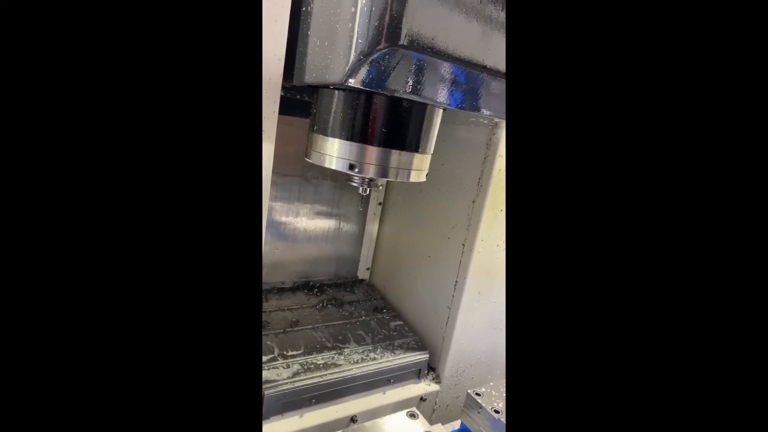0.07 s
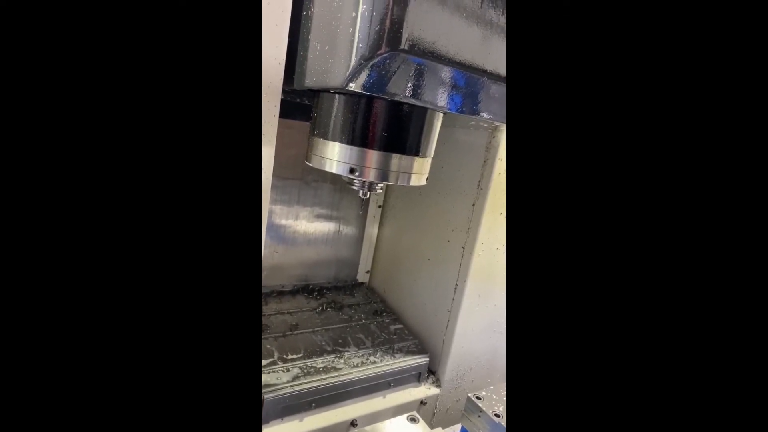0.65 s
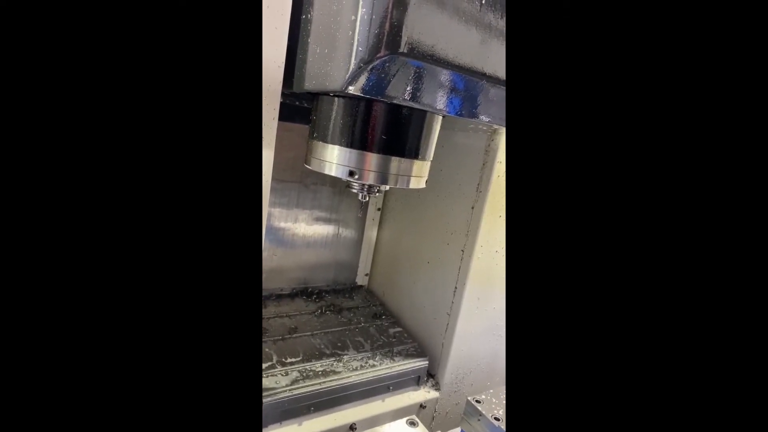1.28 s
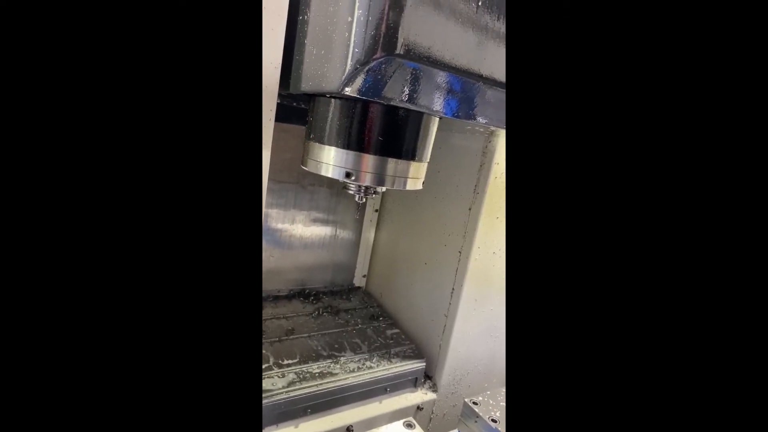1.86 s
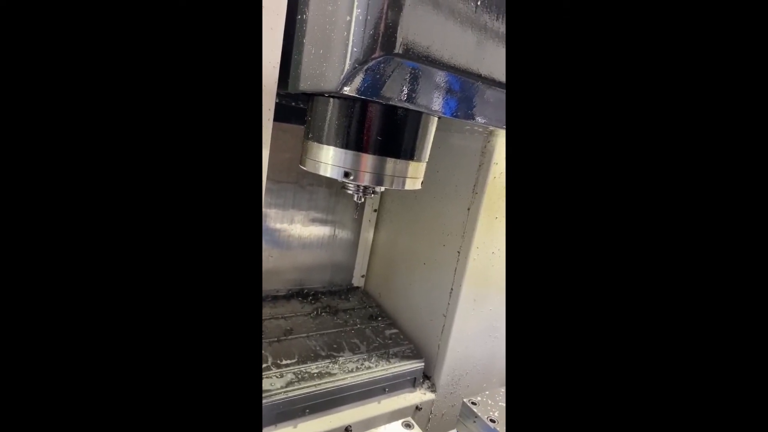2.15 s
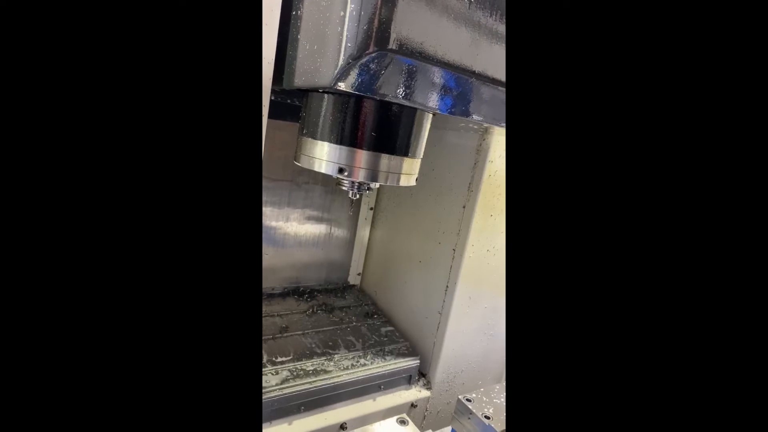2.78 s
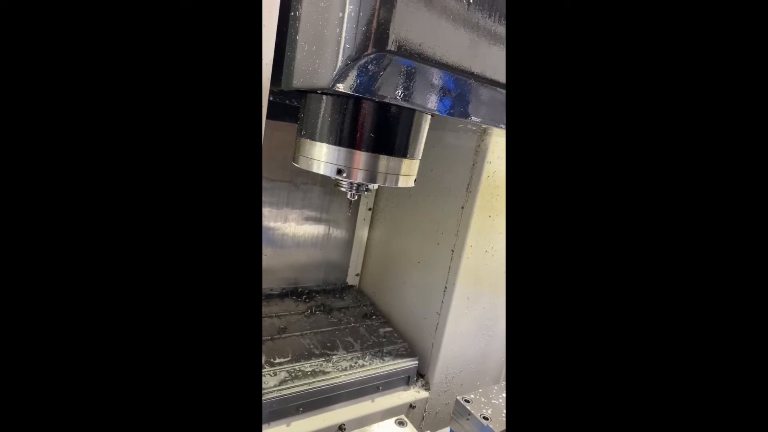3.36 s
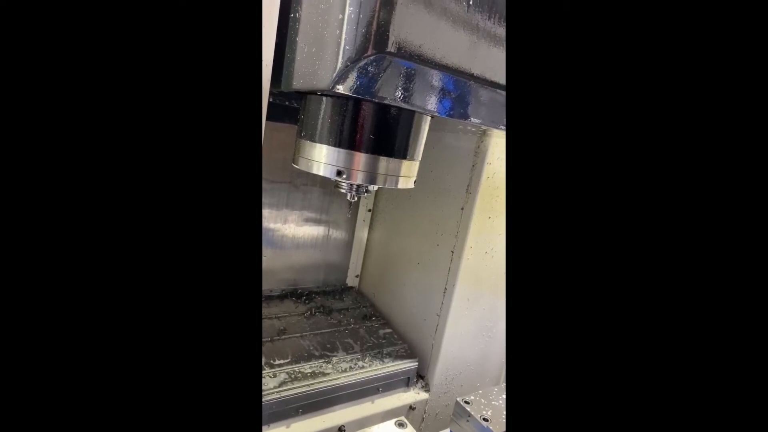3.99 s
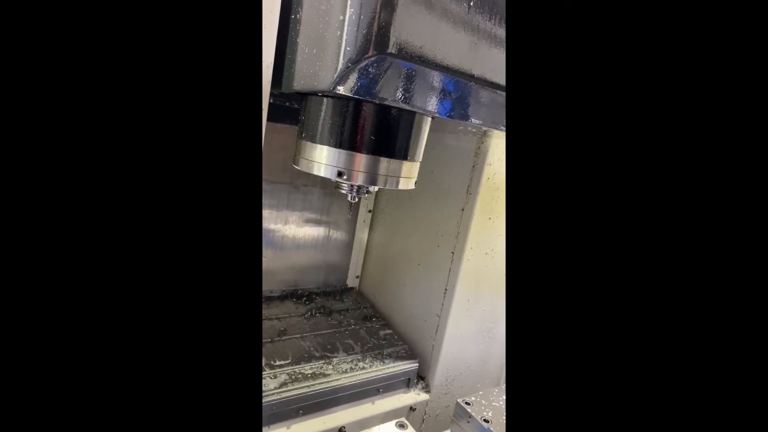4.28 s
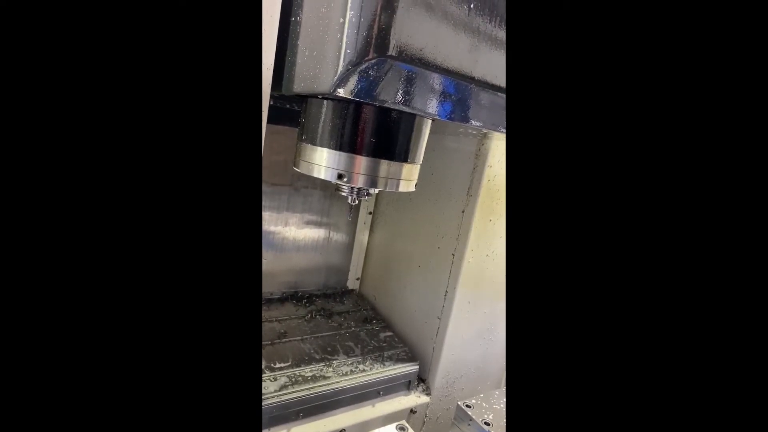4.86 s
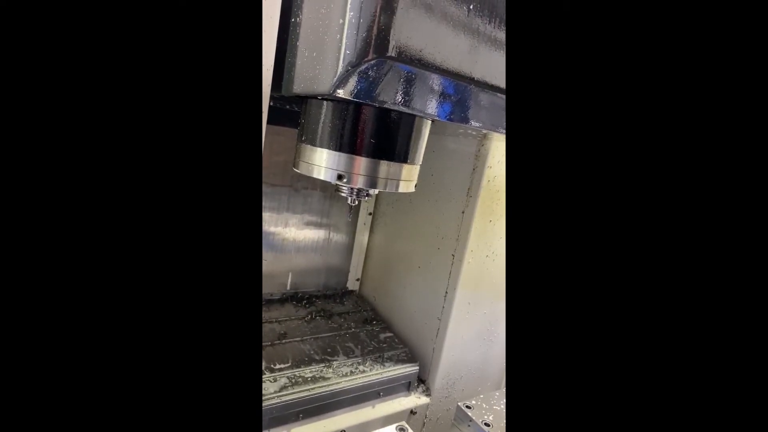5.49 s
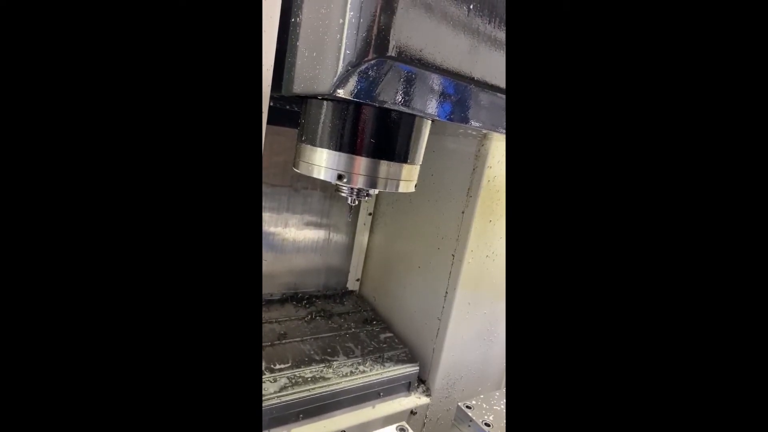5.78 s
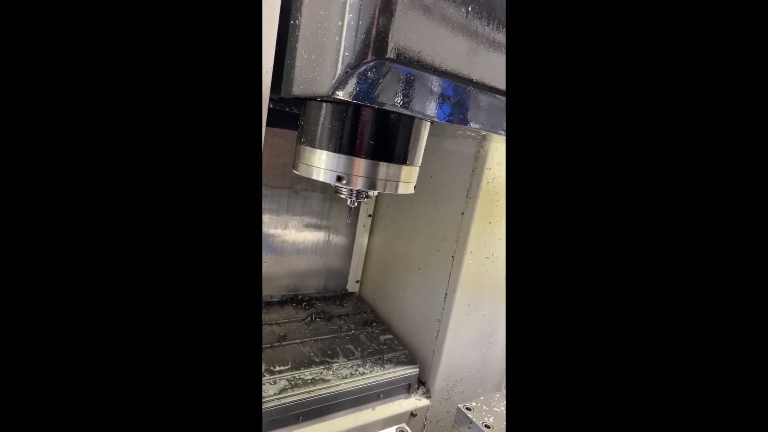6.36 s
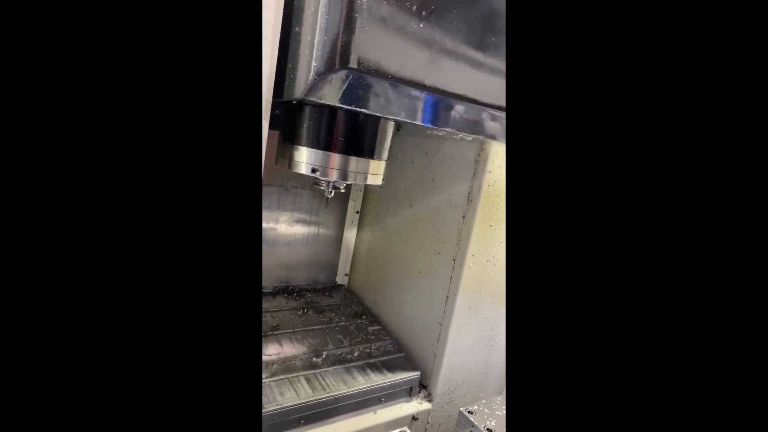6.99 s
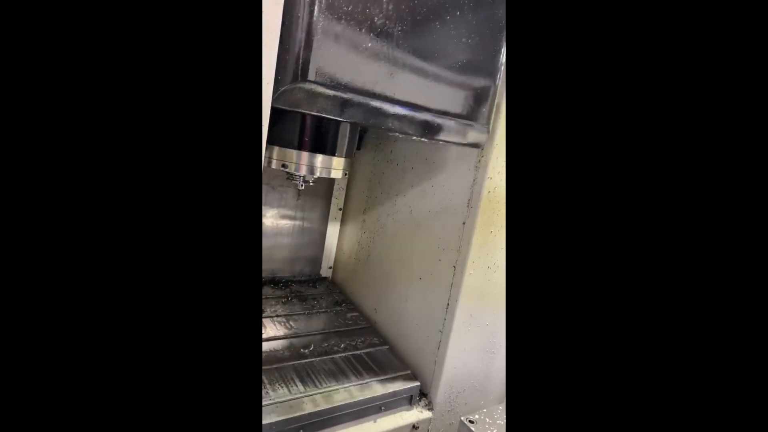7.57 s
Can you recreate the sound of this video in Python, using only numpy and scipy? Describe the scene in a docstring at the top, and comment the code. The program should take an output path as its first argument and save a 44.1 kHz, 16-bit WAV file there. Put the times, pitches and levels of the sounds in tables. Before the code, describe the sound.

A milling machine idles in a workshop, heard at its open door. Air hisses with a thin high whistle inside the steel cabinet, over humming pumps and occasional dull thuds. At first a feed motor drones and stops with a brief groan and rasp. Near the end two clacks sound and the head travels sideways, its sliding covers rumbling and thumping.

```python
"""A machining center idles in a workshop, heard at its open door. Throughout, pumps hum, purge air
hisses and whistles in the steel cabinet, and the frame gives an occasional dull thud.
For the first second a feed axis drones on its ball screw, then brakes with a groan and a rasp.
From about 6.5 s two clacks sound and the head travels sideways: its sliding covers rumble and
thump, more contacts knock, and resonances sweep through the hiss."""
import sys
import numpy as np
from scipy import signal
from scipy.fft import rfft, irfft
from scipy.io import wavfile
from scipy.ndimage import uniform_filter1d

SR = 44100
rng = np.random.default_rng(int(sys.argv[2]) if len(sys.argv) > 2 else 0)


def master(y):
    """Save y as 16-bit WAV."""
    cut = np.clip(np.atleast_2d(y).T, -1, 1)
    pcm = np.round(cut * 32767)  # scale
    wavfile.write(sys.argv[1], SR, pcm.astype(np.int16))


N = 336924
T = np.arange(N) / SR
FRAME = 2048  # noise is shaped on a grid of frequencies HZ by times FRAME_T
HZ = np.fft.rfftfreq(FRAME, 1 / SR)[:, None]
FRAME_T = np.arange(-(-N // (FRAME // 2)) + 1) * FRAME / 2 / SR

# resonances of the steel cabinet: pitch_hz, width_hz, lift_db
CABINET = [(1200, 70, 3.5), (1413, 89, 4.2), (1808, 45, 6.8), (1968, 62, 11.8), (2440, 66, 7.2),
           (2515, 36, 7), (2762, 45, 5), (2880, 70, 3.6), (2984, 40, 9.4), (3120, 40, 2), (3215, 35, 4),
           (3322, 35, 3), (3735, 70, 3.3), (3880, 45, 2.5), (3955, 35, 3.6), (4390, 35, 3), (4542, 40, 5.8),
           (4660, 30, 3), (4770, 46, 3), (4915, 50, 4), (5886, 162, 6.0), (6381, 86, 4.4), (6837, 121, 6.1),
           (7065, 33, 7.0), (7224, 73, 5.7), (7729, 156, 8.1), (8130, 149, 6.6), (8557, 64, 8.1),
           (8991, 69, 7.5), (9671, 71, 6.2), (10151, 82, 5.3), (10391, 52, 5.6), (11920, 170, 6.6),
           (12612, 58, 6.0), (12819, 122, 8.0), (13001, 101, 7.3), (14003, 170, 9.7), (14317, 60, 7.2),
           (15311, 86, 9.5)]
# the head's path across the cabinet: time_s, share_of_way (0-1)
TRAVEL = [(6.45, 0), (6.8, .5), (7.64, 1)]
# stereo image: pitch_hz, likeness (0-1), left_lead_rad, left_over_right_db
STEREO = [(110, 1, 0, -.9), (250, .96, 0, -2.8), (450, .85, 0, -1.3), (680, .6, .1, -.7),
          (1100, .75, 0, -.3), (1450, .985, 0, -.2), (2050, .99, 0, -.2), (2450, .8, .3, -.7),
          (2850, .5, 1.1, -1), (3500, .72, .4, -.5), (4700, .65, .55, -.3), (5500, .88, .15, 0),
          (6100, .7, 1.7, 0), (6450, .85, 2.85, 0), (6950, 1, 3.14, 0), (7550, 1, 3.14, 0),
          (8100, .88, 3.6, 0), (9200, .7, 5.2, 0), (9750, .99, 6.28, 0), (11600, .97, 6.28, 0),
          (12000, .65, 8, 0), (12500, .87, 9.2, 0), (13150, 1, 9.42, 0), (14300, .98, 9.42, 0),
          (15050, .5, 10, 0), (15750, .85, 12.5, 0)]


def feed_axis(drone_db=-40, brake_s=1.02, sag_per_s=0.6, fade_db_per_s=110.5, stop_s=1.2):
    """Servo and ball screw drone over rolling noise, then run down, groan and rasp to a stop."""
    # overtones of the drive: harmonic, level_db
    harmonics = [(1, -22), (2, -27), (3, -12), (4, -5.5), (5, -4), (6, -6), (7, -5), (8, -2.5), (9, 3.5),
                 (10, -1.5), (11, -15), (12, -20), (13, -14), (14, -18), (15, -0.5), (16, -8.5), (17, -12),
                 (18, -10.5), (19, -16), (20, -14)]
    # balls rolling in the screw and guides: pitch_hz, level_db_per_hz
    rolling_colour = [(60, -89), (180, -71), (300, -69), (360, -65), (420, -56.5), (500, -57), (600, -61),
                      (690, -59), (780, -78), (840, -60), (950, -69), (1500, -69), (2500, -101)]
    # decay of the rolling once the balls stop: pitch_hz, fade_db_per_s
    rolling_fade = [(480, 75), (650, 260)]
    # the slide's last rasp: pitch_hz, level_db_per_hz
    rasp_colour = [(450, -77), (720, -52), (800, -77), (880, -65), (1150, -70), (1400, -84), (2500, -97)]
    drive_hz, groan_hz, smear_turns = 54.95, 473, .115
    braking_s = np.maximum(T - brake_s, 0)
    speed = np.maximum(1 - sag_per_s * braking_s, 0)
    turns = drive_hz * np.cumsum(speed) / SR + .008 * wander(6)
    drone = sum(tone(k * drive_hz, k * turns + smear_turns * wander(15),
                     db + drone_db + 2.5 * wander(6.5)) for k, db in harmonics)
    groan = tone(groan_hz, groan_hz * T + smear_turns * wander(15), db=-31.5)
    groan *= bell(T, centre_s=1.113, width_s=.042)
    rasp_gate = np.exp(-((T - 1.19) / .036) ** 4)
    chatter = 1 + .46 * np.sin(2 * np.pi * turns)
    rasp = noise(colour(rasp_colour)) * rasp_gate * chatter
    rolling = noise(colour(rolling_colour) - colour(rolling_fade) * np.maximum(FRAME_T - stop_s, 0))
    return drone * amp(-fade_db_per_s * braking_s) + rolling + groan + rasp


def traverse(start_s=6.445, speed_up_s=.24, level_db=1.5, judder_db=1.5, growl_s=7.05):
    """The covers scrape and judder, louder as the head gathers speed, and a growl builds."""
    # rumble of the slide and its covers: pitch_hz, level_db_per_hz
    slide_colour = [(25, -78), (50, -64), (80, -45), (115, -40.5), (170, -58.5), (250, -52), (320, -58.5),
                    (500, -58), (720, -68), (850, -68), (1100, -68.5), (2400, -74.5), (4800, -74),
                    (9000, -89)]
    speed = 1 - np.exp(-np.maximum(T - start_s, 0) / speed_up_s)
    late = np.clip(FRAME_T - growl_s, 0, 1)
    growl_db = humps([(330, 420, 5)]) * (2 * late - 1)  # the low mids start scooped and fill in
    return noise(colour(slide_colour) + growl_db) * speed * amp(level_db + judder_db * wander(13))


def cover_thumps():
    """The sheet metal of the sliding covers booms as they are shoved along."""
    # shoves: start_s, level_db, hardness_db_per_octave
    thumps = [(6.72, -5, -1), (6.827, -8, -10), (6.94, -13.5, 18), (7.038, -14, -3), (7.114, -10.5, 12),
              (7.146, -15, 6), (7.174, -9, 9), (7.203, -11, -2), (7.268, -11.5, 20.5), (7.316, -6, 7.5),
              (7.352, -16, 6), (7.424, -9, 1), (7.468, -19, 10), (7.503, -15, 1), (7.59, -28, 35)]
    # modes of the cover sheet: pitch_hz, level_db, t60_s
    sheet_modes = [(116.6, 2, 0.1), (150.7, -10.5, 0.033), (211, -23.5, 0.1), (273, -38, 0.048)]
    return booms(thumps, sheet_modes, level_db=-2, push_s=.015)


def clacks(rise_s=.0015, fall_s=.015, ring_rise_s=.0088):
    """As the slide takes up load, contacts rattle the cabinet, knock the frame and ring the steel."""
    # contacts: start_s, rattle_db, knock_db, ring_db, tick_db
    contacts = [(6.481, -6, -5, -44, -20), (6.487, 0, -3, -40, -17), (6.494, -6, 3, -45, -22),
                (6.506, -2, -2, -44, -17), (6.514, -2, -1, -40, -17), (6.528, -9, -12, -43, -22),
                (6.698, -4, -18, -22, -4), (6.706, -8, -18, -45, -9), (6.722, -8, -11, -42, -16),
                (7.12, -16, -3, -45, -25), (7.278, -13, -3, -45, -25), (7.335, -10, -4.5, -42, -22),
                (7.463, -12, -10, -30, -14), (7.515, -9, -2, -40, -20)]
    # midrange rattle: pitch_hz, level_db_per_hz
    rattle_colour = [(300, -74), (700, -54), (1000, -63), (1400, -59.5), (2000, -57.5), (2350, -67),
                     (2800, -63.5), (4000, -76), (9000, -90)]
    # low knock: pitch_hz, level_db_per_hz
    knock_colour = [(30, -61), (90, -39), (160, -47), (260, -47), (340, -62), (440, -44), (530, -60),
                    (740, -59), (1050, -65), (2500, -95)]
    # bright tick: pitch_hz, level_db_per_hz
    tick_colour = [(1500, -85), (3000, -64), (4200, -74), (5600, -58), (6500, -62), (12000, -82)]
    # modes of the struck steel: pitch_hz, level_db, t60_s
    steel_modes = [(991, 0, .055), (1390, -10, .06), (1760, -6, .05), (2310, -8, .18), (2960, -13, .15),
                   (5600, -16, .06)]
    power, ring = np.zeros((3, N)), np.zeros(N)
    t = np.arange(SR // 4) / SR
    burst = np.minimum(t / rise_s, 1) * np.exp(-np.maximum(t - rise_s, 0) / fall_s)
    ringing_s = np.maximum(t - ring_rise_s, 0)
    for start_s, rattle_db, knock_db, ring_db, tick_db in contacts:
        steel = sum(amp(ring_db + db - 60 * ringing_s / t60)
                    * np.sin(2 * np.pi * (hz * t + rng.random())) for hz, db, t60 in steel_modes)
        add_at(ring, start_s, steel * np.minimum(t / ring_rise_s, 1))
        add_at(power, start_s, np.outer(amp([rattle_db, knock_db, tick_db]), burst) ** 2)
    rattle_env, knock_env, tick_env = np.sqrt(power)
    rattle = rattle_env * noise(colour(rattle_colour) + .95 * humps(CABINET))
    knock = knock_env * noise(colour(knock_colour))
    tick = tick_env * noise(colour(tick_colour))
    return rattle + knock + tick + ring


def pumps(pump_hz=221.2, held_hz=446.8, beat_hz=1.083, in_step_s=3.97, second_motor_db=-11):
    """Motor tones waver and beat over a slowly growing rumble of fans and oil."""
    # steady tones of the pump and fan motors: pitch_hz, level_db
    motor_tones = [(55.1, -50), (95.1, -43.5), (110.4, -43.5), (118.4, -43), (173.7, -44), (236.8, -48.5),
                   (258.4, -49.5), (279.9, -64.5), (323.2, -48), (332.6, -55), (362, -57.5), (511.4, -54.5),
                   (559.9, -60.5), (666.1, -60), (835, -55.5)]
    # the pump's tone as its load builds and eases: time_s, level_db
    pump_load = [(0, -49), (2.4, -45.5), (2.85, -42), (4.8, -40), (5.6, -39), (6.1, -53), (7.64, -37)]
    # the pump's octave: time_s, level_db
    octave_levels = [(1.5, -55), (2, -50.5), (2.3, -60), (2.72, -62), (2.87, -47.5), (3.4, -45), (3.7, -57),
                     (3.95, -50), (4.6, -49.5), (5.2, -47.5), (5.5, -55), (5.68, -47.5), (5.85, -61)]
    # a motor tone just above that octave swells, holds and fades: time_s, level_db
    held_levels = [(3.7, -70), (3.92, -46), (4.25, -43.5), (4.52, -43), (4.62, -52), (5.2, -54), (5.5, -70)]
    # fans and flowing oil: pitch_hz, level_db_per_hz
    rumble_colour = [(25, -88), (40, -84), (55, -50), (80, -75), (105, -54.5), (150, -54), (190, -71),
                     (225, -59), (300, -67.5), (410, -74), (520, -70), (750, -76.5), (1100, -74),
                     (1500, -87)]
    fluttered_s = T + .00013 * wander(24)
    hum = sum(tone(hz, hz * fluttered_s + .1 * wander(3), db - 1 + 2 * (1 + hz / 1000) * wander(4.4))
              for hz, db in motor_tones)
    turns = pump_hz * fluttered_s + .038 * wander(1.7)
    # a second motor runs slightly slower and beats with the pump
    beat = 1 + amp(second_motor_db) * np.exp(-2j * np.pi * beat_hz * (T - in_step_s))
    pump = abs(beat) * tone(pump_hz, turns + np.angle(beat) / (2 * np.pi), curve(pump_load))
    octave = tone(2 * pump_hz, 2 * turns, curve(octave_levels) + 1.2 * wander(2.7))
    held = tone(held_hz, held_hz * fluttered_s, curve(held_levels))
    flow_db = -.5 + .4 * T + 1.1 * wander(5.9)
    return hum + pump + octave + held + noise(colour(rumble_colour)) * amp(flow_db)


def purge_air(detune=.03, sweep_width_hz=105, sizzle_hz=8400, sizzle_width_hz=2000):
    """Air hisses through the cabinet's resonances, which dissolve into sweeps as the head moves."""
    # hiss between the resonances: pitch_hz, level_db_per_hz
    hiss_colour = [(300, -100), (1250, -75.1), (1600, -69.3), (2300, -67.0), (3100, -69.5), (3900, -69.4),
                   (4800, -72), (5600, -75.8), (7400, -75.1), (8300, -70.6), (10000, -73.0), (11500, -77.9),
                   (13500, -80.0), (15700, -78.1)]
    # dips where echoes in the cabinet cancel: pitch_hz, width_hz, lift_db
    dips = [(1720, 35, -2.5), (1890, 45, -2.5), (2080, 40, -2), (2350, 50, -3), (2660, 80, -2.5),
            (2818, 40, -4), (3040, 40, -6), (3270, 40, -3), (3378, 42, -8), (4000, 35, -3), (4230, 120, -1),
            (5680, 130, -2.5)]
    # resonances as the head passes the walls: centre_s, half_length_s, pitch_hz, glide_hz_per_s, lift_db
    sweeps = [(6.59, .04, 1980, 0, 4), (6.87, .12, 2330, -450, 7), (6.86, .12, 2860, 300, 4),
              (6.92, .17, 3240, 200, 6), (6.92, .2, 4690, 200, 7.5), (7.01, .07, 1930, -1500, 8),
              (7.12, .12, 4480, -400, 6), (7.19, .08, 2280, -900, 7.5), (7.19, .06, 1920, 1200, 5.5),
              (7.26, .11, 3790, -700, 9.5), (7.39, .07, 3610, 200, 12), (7.43, .06, 4690, -600, 8.5),
              (7.52, .09, 2380, -700, 5)]
    # brief swells of the sizzle: centre_s, lift_db
    swells = [(.31, 3.5), (.9, 4)]
    way = curve(TRAVEL, FRAME_T)
    cabinet_db = humps(CABINET + dips, 1 + detune * way)
    blurred_db = uniform_filter1d(cabinet_db, size=31, axis=0)
    cabinet_db += np.minimum(2 * way, 1) * (blurred_db - cabinet_db)  # fully blurred by halfway
    sweep_db = sum(bell(FRAME_T, s, half) * humps([(hz + glide * (FRAME_T - s), sweep_width_hz, db)])
                   for s, half, hz, glide, db in sweeps)
    swell_db = sum(db * bell(FRAME_T, s, width_s=.11) for s, db in swells)
    sizzle_band = 1 / (1 + (2 * (HZ - sizzle_hz) / sizzle_width_hz) ** 4)
    sizzle_db = (swell_db - 3 * way) * sizzle_band
    return noise(colour(hiss_colour) + cabinet_db + sweep_db + sizzle_db + wall_echoes(way) + .8 * way)


def wall_echoes(way, count=40, nearest_s=.003, spread_s=.011, detour_s=.0014):
    """Wall echoes comb the hiss (in dB); as the head moves, their paths lengthen and the comb deepens."""
    steps = np.linspace(0, 1, num=50)
    combs = sum(np.cos(2 * np.pi * (HZ * (nearest_s + spread_s * place + detour_s * change * steps) + p))
                for place, change, p in rng.random((count, 3)))
    step_now = np.round(way * (len(steps) - 1)).astype(int)
    depth_db = 1.6 + 2.4 * np.sqrt(way)
    trim_db = np.log(10) / 20 * depth_db ** 2  # keeps the power steady
    return depth_db * np.sqrt(2 / count) * combs[:, step_now] - trim_db


def whistle(lower_fade_db=-22, surge_db=1.2):
    """Air surges through the spindle's gap on two narrow tones; the lower fades as the head leaves."""
    # the two tones: pitch_hz, width_hz, level_db_per_hz
    gap_tones = [(3464, 44, -58.4), (3563, 50, -59)]
    # rise and fall of the whistle: time_s, level_db
    levels = [(0, -6), (1.15, -5), (1.5, -1.5), (2.4, -2.5), (2.85, 0), (3.5, 0.5), (3.7, -1.5), (6.4, 0.5),
              (6.62, 0), (6.95, 4.5), (7.26, 3), (7.35, -4), (7.64, -14)]
    lower, upper = (amp(db) / (1 + (2 * (HZ - hz) / width) ** 2) for hz, width, db in gap_tones)
    tones = lower * amp(lower_fade_db * curve(TRAVEL, FRAME_T)) + upper
    return noise(20 * np.log10(tones)) * amp(curve(levels) + surge_db * wander(20))


def frame_thuds():
    """The machine frame thuds dully on two low modes."""
    # thuds: start_s, level_db
    thuds = [(.49, -28), (.918, -31), (1.046, -30), (1.169, -27.5), (2.627, -23.5), (4.315, -32),
             (4.575, -30), (5.02, -30), (6.432, -25.5), (7.015, -25), (7.295, -24), (7.494, -25)]
    # modes of the frame: pitch_hz, level_db, t60_s
    frame_modes = [(65, 4.5, 0.22), (75, 3.5, 0.14)]
    return booms([(s, db, 0) for s, db in thuds], frame_modes, level_db=-5, push_s=.033)


def booms(shoves, modes, level_db, push_s):
    """Each shove builds over a cycle or two and sets the modes booming; harder ones are brighter."""
    out = np.zeros(N)
    t = np.arange(SR // 3) / SR
    swell = np.sin(np.pi / 2 * np.minimum(t / push_s, 1)) ** 2
    ringing_s = np.maximum(t - push_s, 0)
    for start_s, shove_db, hardness in shoves:
        ring = sum(amp(db + hardness * np.log2(hz / modes[0][0]) - 60 * ringing_s / t60)
                   * np.sin(2 * np.pi * hz * rng.uniform(1, 1.04) * t) for hz, db, t60 in modes)
        add_at(out, start_s, amp(shove_db + level_db) * swell * ring)
    return out * amp([[-.5], [.5]])  # slightly to the right


def noise(db):
    """Noise with the given dB per Hz, spread across the stereo image."""
    left, other = signal.stft(rng.standard_normal((2, N)), nperseg=FRAME)[2]
    likeness = np.clip(colour(STEREO), 0, 1)
    lag = np.exp(-1j * colour(STEREO, column=2))
    right = (likeness * left + np.sqrt(1 - likeness ** 2) * other) * lag
    lean = amp(colour(STEREO, column=3) / 2)
    spectra = np.array([left * lean, right / lean]) * amp(db) * np.sqrt(SR / 2)
    return signal.istft(spectra, nperseg=FRAME)[1][:, :N]


def tone(hz, turns, db):
    """A sine with its phase in turns and rms level in dB, panned by its pitch."""
    lean = amp(colour(STEREO, hz, column=3) / 2)
    sine = np.sqrt(2) * amp(db) * np.sin(2 * np.pi * (turns + rng.random()))
    return np.array([sine * lean, sine / lean])


def humps(resonances, tuning=1):
    """Lift in dB of a set of resonances, all detuned by one factor."""
    return sum(db / (1 + (2 * (HZ - hz * tuning) / width) ** 2) for hz, width, db in resonances)


def colour(points, hz=HZ, column=1):
    """A column of a spectrum table, read on a log-frequency axis."""
    table = np.transpose(points)
    return np.interp(np.log(hz + 1), np.log(table[0] + 1), table[column])


def curve(points, t=T):
    """Straight lines through the points of a time table."""
    return np.interp(t, *np.transpose(points))


def wander(rate_hz):
    """Slow random drift of unit size."""
    low_pass = np.exp(-(np.fft.rfftfreq(N, 1 / SR) / rate_hz) ** 2)
    drift = irfft(rfft(rng.standard_normal(N)) * low_pass, N)
    return drift / drift.std()


def bell(t, centre_s, width_s):
    """A smooth swell of height 1."""
    return np.exp(-((t - centre_s) / width_s) ** 2)


def amp(db):
    """Decibels to gain."""
    return 10 ** (np.asarray(db) / 20)


def add_at(track, start_s, sound):
    """Mix a short sound into a track."""
    start = round(start_s * SR)
    track[..., start:start + sound.shape[-1]] += sound[..., :N - start]


def scene():
    """The idling machine, with its moves and knocks on top."""
    idle = purge_air() + whistle() + pumps()
    return idle + feed_axis() + traverse() + cover_thumps() + frame_thuds() + clacks()


def record(dry, low_cut_hz=36, high_cut_hz=15760):
    """A gentle low cut and a steep high cut."""
    thinned = signal.sosfilt(signal.butter(2, low_cut_hz, "highpass", fs=SR, output="sos"), dry)
    low_pass = signal.firwin(1023, high_cut_hz, window=("kaiser", 9), fs=SR)
    return signal.oaconvolve(thinned, low_pass[None], "same", axes=1)


dry = scene()
out = record(dry)
master(out)
```